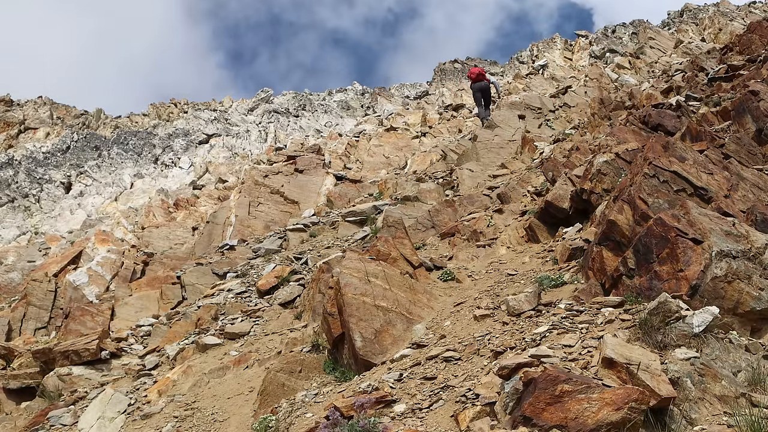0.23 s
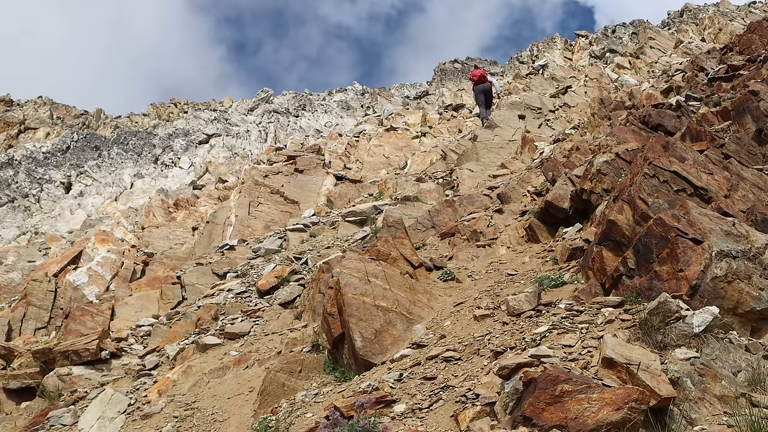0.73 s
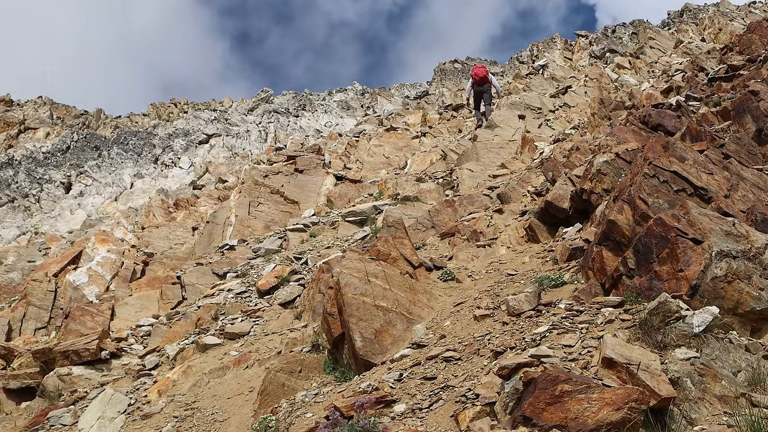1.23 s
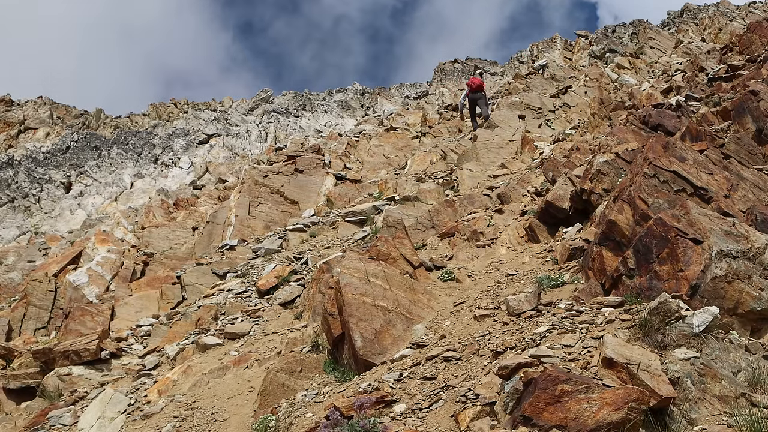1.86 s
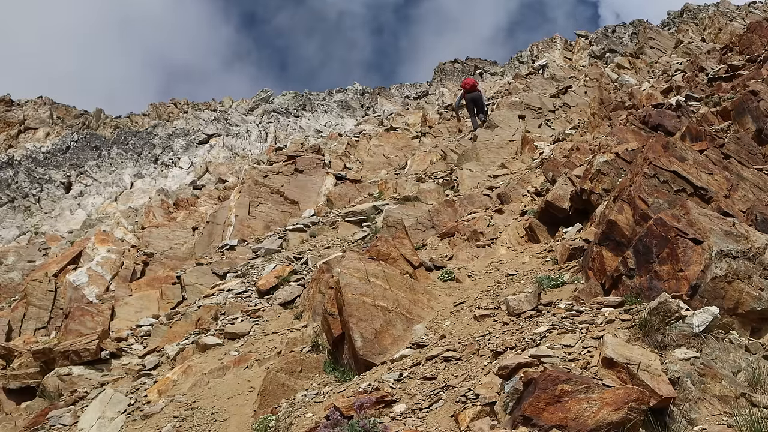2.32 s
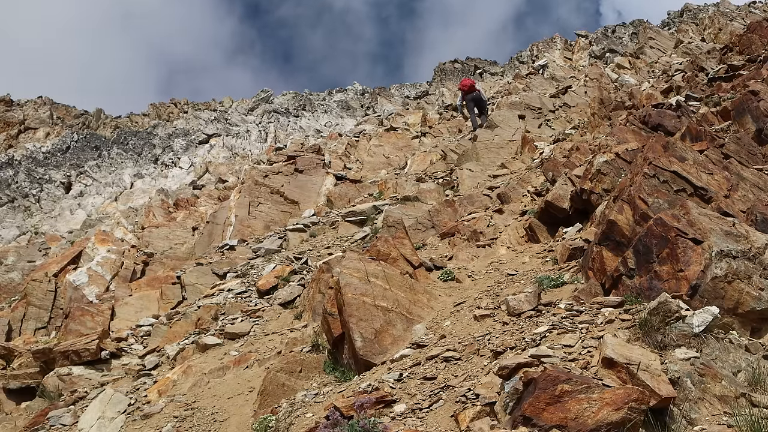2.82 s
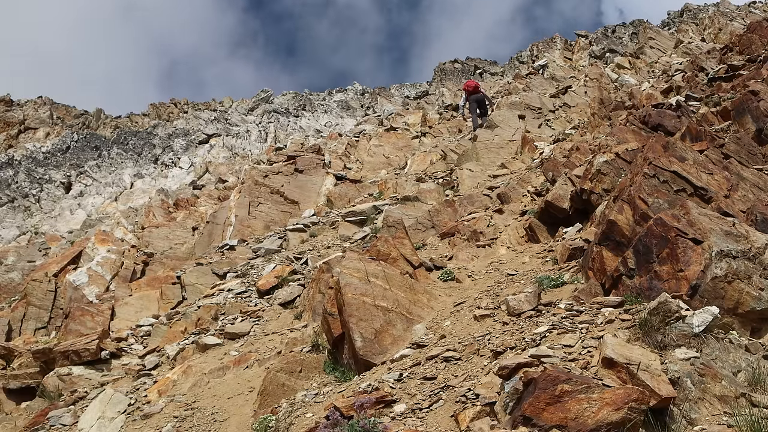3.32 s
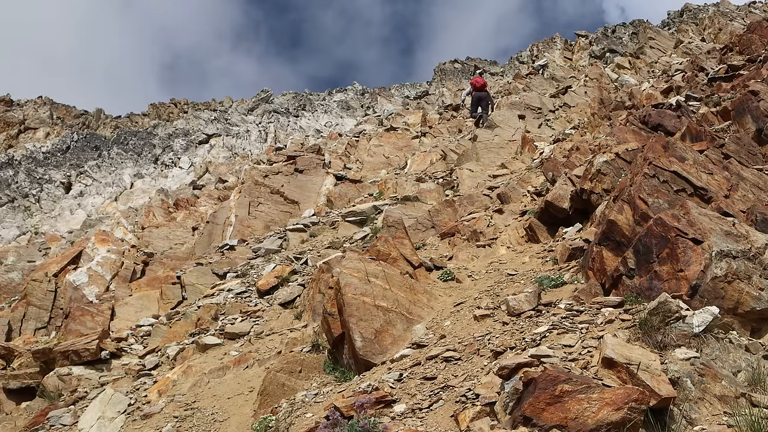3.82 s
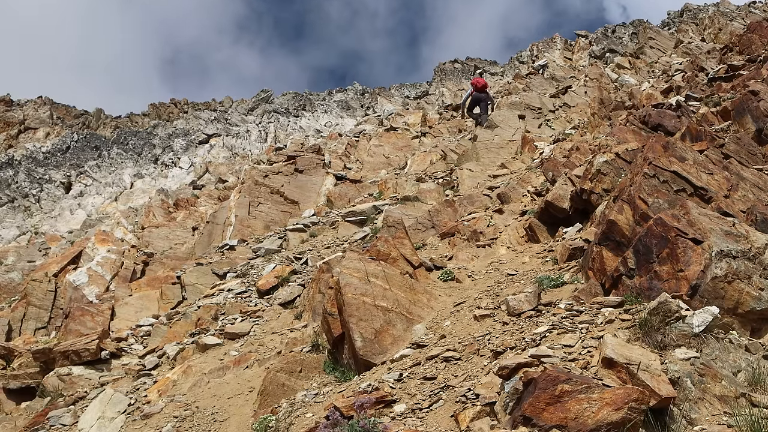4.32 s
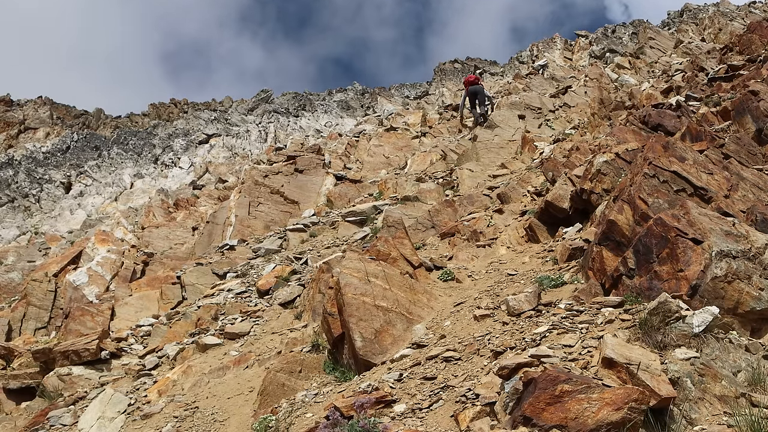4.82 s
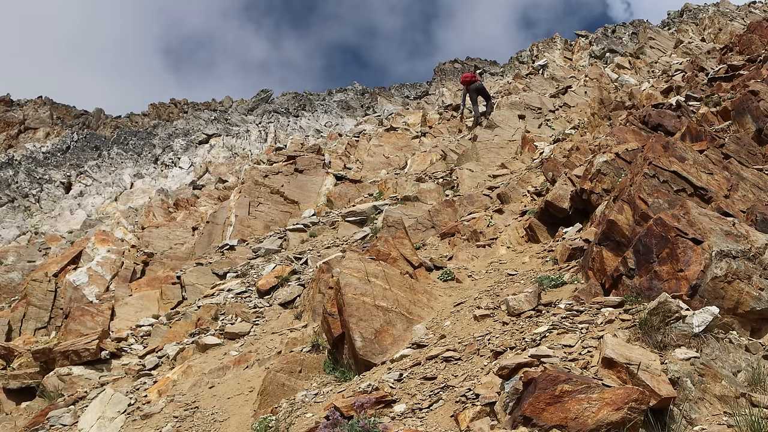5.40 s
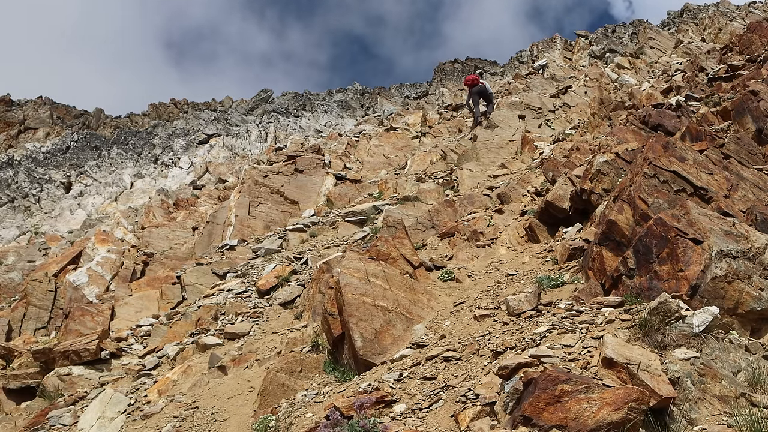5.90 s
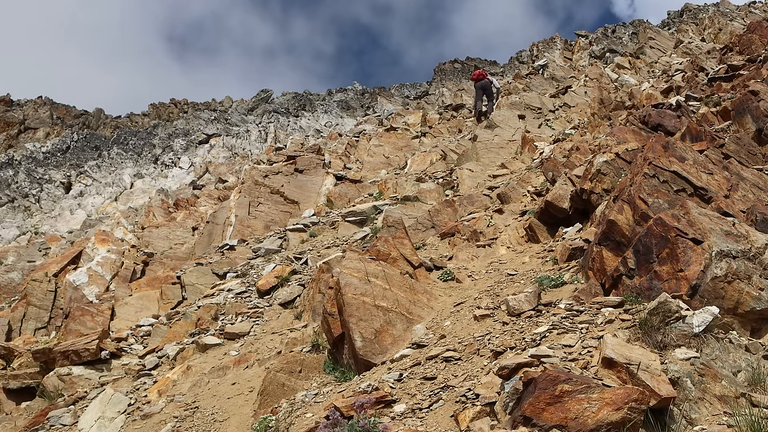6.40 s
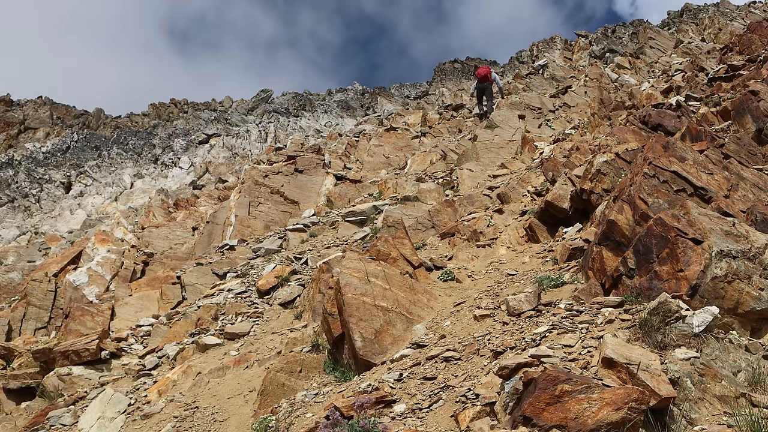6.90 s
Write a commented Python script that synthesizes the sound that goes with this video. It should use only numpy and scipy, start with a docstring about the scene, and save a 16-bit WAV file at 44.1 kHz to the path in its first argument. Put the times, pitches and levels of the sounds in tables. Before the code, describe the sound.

Loose stones knocked free on a steep rocky slope click, crack and grind irregularly over pattering grit, growing louder as they tumble closer outdoors.

```python
"""Stones knocked loose by boots on a steep slope click, crack and grind together, louder as they tumble closer.
Each contact is a set of short dying tones with a burst of bright noise, small ticks and a scrape of sand noise.
Grit patters between them as thousands of tiny rings over sand hiss and a low rumble; heavier stones thud as
low tones, and some stones ring longer on one note, from low tocks to high pings. Steady filtered noise makes
the soft outdoor floor, and a small microphone adds hiss and two treble resonances."""
import sys
import numpy as np
from scipy import signal
from scipy.fft import rfft, irfft, next_fast_len
from scipy.io import wavfile
from scipy.ndimage import uniform_filter1d, map_coordinates

SR = 44100
rng = np.random.default_rng(int(sys.argv[2]) if len(sys.argv) > 2 else 0)


def materialize(psi):
    """Save the field psi as 16-bit PCM at rate SR to the path in sys.argv[1].

    A 1-D psi becomes a single channel; in a 2-D psi each row is a channel.
    """
    bounded = np.clip(np.atleast_2d(psi).T, -1, 1)
    quanta = np.round(bounded * 32767).astype(np.int16)
    wavfile.write(sys.argv[1], SR, quanta)


def voltage_ratio(level):
    """Linear amplitude factor for a level in decibels (scalar or array-like)."""
    return 10 ** (np.asarray(level, float) / 20)


N = 315756  # length in samples

# The colour of sliding sand. Each row: frequency in Hz, relative level in dB.
SAND_COLOUR = [(290, -1), (500, 3.5), (5130, 2.5), (8600, -0.5), (10100, -13.5), (12700, -3), (15500, -26)]


def unit(x):
    """Scales a sound to an rms (average strength) of 1."""
    return x / np.sqrt(np.mean(x ** 2) + 1e-20)


def coloured(x, points):
    """Filters x through a spectrum drawn by (Hz, dB) points on a log frequency axis."""
    m = next_fast_len(N + 8192)
    f, v = np.transpose(points)
    gain = voltage_ratio(np.interp(np.log(np.fft.rfftfreq(m, 1 / SR) + 1), np.log(f + 1), v))
    return irfft(rfft(x, m) * gain, m)[:N]


def placed(s, rows):
    """Adds up short sounds, one a row, starting at times s in seconds."""
    at = np.round(np.asarray(s) * SR).astype(int)[:, None] + np.arange(rows.shape[1])
    return np.bincount(at.ravel(), rows.ravel(), N + SR)[:N]


def rings(hz, db, cycles, rise, size):
    """Struck tones: sines that fall 60 dB in a number of cycles; rise is the time constant in cycles."""
    turns = np.clip(hz, 50, SR / 2.2)[:, None] * np.arange(size) / SR  # cycles since the start
    fall = voltage_ratio(db[:, None] - 60 * turns / cycles)
    return fall * (1 - np.exp(-turns / rise)) * np.sin(2 * np.pi * turns)


def outdoor_air():
    """The steady outdoor floor is random noise, strongest in the bass."""
    # Colour of the floor. Each row: frequency in Hz, relative level in dB.
    air_colour = [(15, 4), (45, 9), (80, 0.5), (300, -19), (2500, -31), (9000, -51)]
    return voltage_ratio(-57.5) * unit(coloured(rng.standard_normal(N), air_colour))


def microphone_hiss():
    """The microphone's own hiss is plain white noise."""
    return voltage_ratio(-71) * rng.standard_normal(N)


def sliding(s):
    """How busy the slide is: its level in dB at times s, which guides the grit and the lesser contacts."""
    # Course of the slide. Each row: time in seconds, level in dB.
    slide_level = [(0.0, -48.5), (0.8, -52.5), (1.04, -47.5), (1.33, -49), (1.36, -45), (1.93, -43),
                   (2.79, -41), (3.05, -37), (3.81, -38), (3.95, -42), (4.21, -39), (4.65, -36),
                   (4.69, -36), (5.14, -37), (5.44, -40.5), (5.7, -42.5), (6.1, -40.5), (6.52, -44),
                   (6.86, -39), (7.16, -40)]
    return np.interp(s, *np.transpose(slide_level))


def grit_patter(count=6500):
    """Small chips ring in clumps, few of them large; the lower ticks are the softer."""
    luck, chance = rng.standard_normal((count, 2)), rng.random((count, 2))
    start = chance[:, 0] * N / SR
    clumps_db = 3 * map_coordinates(rng.standard_normal(600), [start * 50])  # 50 random points a second
    size_db = np.minimum(-4.0 * np.log(chance[:, 1] + 1e-9), 16) + clumps_db
    size_db += 3.9 * np.minimum(luck[:, 0], 0) + 2.8 * np.maximum(luck[:, 0], 0)
    hz = 4300 * np.exp(0.8 * luck[:, 0])
    return unit(placed(start, rings(hz, size_db, cycles=18.0, rise=0.038, size=300)))


def sand_hiss():
    """Sliding sand is noise whose strength varies in patches over pitch and time."""
    z = signal.stft(rng.standard_normal(N + 512), nperseg=256)[2]
    patches = uniform_filter1d(rng.standard_normal(z.shape), size=10, axis=0)
    patches = uniform_filter1d(patches, size=10, axis=1)
    # the swells reach wider in pitch and last longer
    swells = uniform_filter1d(rng.standard_normal(z.shape), size=16, axis=0)
    swells = uniform_filter1d(swells, size=70, axis=1)
    field_db = 2.5 * unit(patches) + 2.2 * unit(swells)
    noise = signal.istft(z * voltage_ratio(field_db), nperseg=256)[1][:N]
    return unit(coloured(noise, SAND_COLOUR))


def low_rumble(clock):
    """The ground rumbles as low noise in random lumps."""
    # Colour of the rumble. Each row: frequency in Hz, relative level in dB.
    ground_colour = [(60, 6), (130, 2), (300, 0.5), (450, -4), (1000, -24.5)]
    # Course of the rumble. Each row: time in seconds, level in dB ahead of the scene's bass cut.
    rumble_level = [(0, -49.5), (0.85, -53.5), (1.0, -46), (2.5, -45), (3.5, -46), (5.25, -42.5),
                    (5.45, -45.5), (7.16, -45)]
    lumps = voltage_ratio(3.2 * map_coordinates(rng.standard_normal(400), [clock * 40]))  # 40 random points a second
    rumble = unit(lumps * coloured(rng.standard_normal(N), ground_colour))
    return voltage_ratio(np.interp(clock, *np.transpose(rumble_level))) * rumble


def grit():
    """Pattering chips throw up sand, with a treble that changes over time, above the rumble."""
    # Course of the grit's treble. Each row: time in seconds, gain in dB.
    treble_gain = [(0, -17), (1.4, 2.5), (2.7, 1), (3.3, 3.5), (4.5, -3), (5.4, 1), (5.9, 6), (7.16, 7)]
    clock = np.arange(N) / SR
    patter = grit_patter()
    fizz = unit(1 + 1.64 * uniform_filter1d(np.abs(patter), size=60))  # every tick throws up sand
    fine = voltage_ratio(sliding(clock)) * (voltage_ratio(-3.22) * patter + voltage_ratio(-5.5) * sand_hiss() * fizz)
    treble = signal.sosfiltfilt(signal.butter(2, 9500, "high", fs=SR, output="sos"), fine)
    fine = fine + (voltage_ratio(np.interp(clock, *np.transpose(treble_gain))) - 1) * treble
    return fine + low_rumble(clock)


def lesser(count=230):
    """Smaller contacts come by chance, 26 a second on average, and louder when the slide is busy."""
    s = np.cumsum(rng.exponential(size=count)) / 26
    size, pitch, crack, grind = np.clip(rng.standard_normal((count, 4)), -2, 1.5).T
    ring_db = sliding(s) + 8 + 4 * size
    hz = 2800 * np.exp(.7 * pitch)
    # same columns as the clear contacts
    rows = np.transpose([s, ring_db, hz, 2.5 + 7 * crack, -19 + 3 * grind])
    return rows[s < N / SR]


def chip_rings(hz, db, luck):
    """A struck chip rings at its own pitch and at stray ones, snaps broadly and pushes the ground."""
    ring = rings(hz, db, cycles=8.4, rise=0.13, size=1400)
    ring += rings(hz * .55 * np.exp(.25 * luck[:, 0]), db - 8, cycles=6.0, rise=.3, size=1400)
    ring -= rings(hz * 1.957 * np.exp(0.28 * luck[:, 1]), db - 4.0, cycles=14.3, rise=1.0, size=1400)
    # big stones, low in pitch, snap harder
    snap_db = db - 2.5 - 5 * np.log2(hz / 800)
    ring += rings(np.full_like(hz, 3600), snap_db, cycles=2.9, rise=0.12, size=1400)
    # the ground's soft answer, kept to -25 dB at most
    push_db = np.minimum(db - 17.5 + 5 * luck[:, 2] - 3 * np.log2(hz / 2500), -25)
    push_hz = 309.5 * np.exp(0.22 * luck[:, 3])
    return ring + rings(push_hz, push_db, cycles=7.1, rise=0.49, size=1400)


def chip_cracks(s, crack_db):
    """The crack of a blow is bright noise that falls 60 dB in 9.2 ms."""
    t = np.arange(1400) / SR
    shape = placed(s, voltage_ratio(crack_db[:, None] - 60 * t / 0.0092) * (1 - np.exp(-t / 0.0014)))
    bright = coloured(rng.standard_normal(N), [(4000, 5.0), (7000, 8.0), (15500, -2.0)])
    return shape * unit(bright)


def chip_grinds(s, hz, grind_db, count=16):
    """A chip jostles its neighbours after the blow: a dying cluster of small ticks and a scrape of sand."""
    delay = .033 * rng.random((len(s), count)) ** 1.5  # seconds after the blow
    jostle = np.clip(rng.standard_normal((len(s), count, 2)), -1.2, 2)
    tick_hz = hz[:, None] ** .5 * 60 * np.exp(0.556 * jostle[..., 0])  # leans towards the chip's pitch
    tick_db = grind_db[:, None] + 8 + 2.45 * jostle[..., 1] + 2.35 * jostle[..., 0] - 60 * delay / 0.033
    ticks = rings(tick_hz.ravel(), tick_db.ravel(), cycles=14.4, rise=0.051, size=400)
    rattle = placed((s[:, None] + delay).ravel(), ticks)
    t = np.arange(1400) / SR
    scrape = placed(s, voltage_ratio(grind_db[:, None] - 4 - 60 * t / 0.042) * (1 - np.exp(-t / 0.0011)))
    return rattle + scrape * unit(coloured(rng.standard_normal(N), SAND_COLOUR))


def contacts():
    """Stones strike each other: every contact rings, cracks and grinds to rest."""
    # The clear contacts. Each row: start in seconds, ring level in dB, ring pitch in Hz,
    # crack level in dB over the ring, grind level in dB over the ring.
    clear_contacts = [(0.0286, -19.5, 5300, -20, -21), (0.0515, -24, 4400, -29.0, -14),
                      (0.0668, -21, 2520, -21, -21), (0.1051, -28, 1800, -3, -23),
                      (0.1994, -16, 2470, -33.0, -19.5), (0.2622, -18.5, 5400, -13, -34),
                      (0.4226, -15.5, 2060, -30, -20.5), (0.4872, -15.5, 3700, -31.0, -21),
                      (0.5288, -19, 5370, -7, -20), (0.6924, -26, 4340, -24, -15),
                      (0.891, -26, 2640, -19, -24), (0.9115, -21.5, 2080, -34.0, -31),
                      (0.935, -20, 3030.0, -30.0, -12), (0.9718, -25, 2730, -25, -25),
                      (0.9769, -19, 2080, -24.0, -16), (0.9965, -19, 2550, -25, -20),
                      (1.0036, -20.5, 1710, -30, -17), (1.0299, -26.5, 1340, -28.0, -11),
                      (1.062, -26, 1410, -20, -21), (1.1295, -29.5, 1700, -25, -18),
                      (1.153, -31, 1800, -20, -20), (1.2124, -6.5, 3070, -34, -29),
                      (1.2415, -33, 1710, -13, -2.5), (1.3471, -24.5, 5100, -13, -8),
                      (1.3863, -19, 4680, -16.0, -22), (1.4165, -28, 4660, -15, -20),
                      (1.4275, -26, 1160, -20, -24), (1.4435, -20, 1180, -26.0, -14),
                      (1.4456, -15.5, 3850, -25, -22.5), (1.5855, -26, 1830, -20, -25),
                      (1.598, -14.5, 3430, -16, -16), (1.6294, -22, 3020, 2.5, -13),
                      (1.7565, -20.5, 3670, -18, -28), (1.9568, -32, 900, 12.5, -2),
                      (1.9983, -12, 5300, -26, -18.5), (2.0982, -13.5, 5430.0, -15, -25),
                      (2.1065, -11, 6750, -5, -36), (2.1436, -24.5, 1120, -17.0, -11),
                      (2.241, -24, 2200, -17, -8), (2.2845, -26, 890, -15, -25),
                      (2.3003, -12.5, 2080, -29.0, -19), (2.4046, -22, 2520, -27.0, -6),
                      (2.4275, -23, 4250, -15, -27), (2.4721, -20, 1090, -19, -13),
                      (2.5115, -20.5, 1750, -20, -22), (2.566, -19.5, 677, 3, -36),
                      (2.7032, -11.5, 8100, -7, -35), (2.719, -19.5, 2100, -19, -16),
                      (2.8601, -20, 1700, -19.0, -11), (2.905, -13.5, 1460, -8, -10),
                      (2.9088, -11, 4500, -22.0, -11), (2.9228, -15.5, 1360, 11, -10.5),
                      (2.964, -3.5, 4630, -26.0, -26), (3.0956, -27, 1970, -15, -6),
                      (3.1512, -14, 1130, -7, -15), (3.1847, -10.5, 2670, -27.0, -17),
                      (3.3027, -12, 6140, 1.5, -25), (3.3057, -10, 8200, -13, -45),
                      (3.3219, -16, 2860, -22, -12), (3.3332, -9, 3840, -14, -14),
                      (3.3412, -16, 2340, -25, -16), (3.5099, -15.5, 2980, -8, -13),
                      (3.5166, -8.5, 1980, -24.0, -23.5), (3.532, -7.5, 3550, -29.0, -26),
                      (3.6437, -14, 1030, -12, -7.5), (3.7519, -7, 2920, -13, -23.5),
                      (3.7672, -8.0, 3550, -16, -12), (3.9303, -9.5, 4050, -17.0, -21),
                      (3.9476, -6.5, 2450, -22, -18), (3.9593, -15.5, 1850, -25.0, -12),
                      (3.9785, -21, 1800, -20, -18), (4.1065, -21, 2090, -20, -28),
                      (4.127, -23, 1060, -20, -28), (4.1628, -10.5, 6540.0, -13, -22),
                      (4.2347, -12, 3890.0, -30, -24), (4.288, -22.5, 795, -15, -9.5),
                      (4.2993, -7, 9300, -25, -20), (4.3688, -15, 2350, -22, -39),
                      (4.3995, -14.5, 2720, -26, -16), (4.488, -32, 2500, -20, -30),
                      (4.4982, -9.5, 3580, -33.0, -14.5), (4.5487, -3, 3740, -27, -24),
                      (4.6071, -15, 4560, -18.0, -12), (4.6328, -12, 6000, -11, -10),
                      (4.7343, -14, 8450, -0.5, -16.5), (4.8139, -7, 5940, -21, -19.5),
                      (4.8337, -11.5, 5600, -17, -18), (4.8861, -13.5, 2800, -21.0, -9),
                      (4.9073, -3.5, 6500, -12, -21), (4.9249, -10.5, 2870, -3, -31),
                      (4.9975, -9.5, 7400, -13, -26), (5.017, -10, 6100, -12, -32),
                      (5.0595, -3, 2600, -10, -21), (5.0808, -13, 7390.0, -18, -39),
                      (5.0935, -26, 1000, -20, -33), (5.1155, -17.5, 2500, -20, -5.5),
                      (5.1204, -5, 3420, -24, -18), (5.1345, -31, 4000, -12, -30),
                      (5.1635, -14.5, 6000, -15, -19), (5.182, -10.5, 3320, -32.0, -16.5),
                      (5.1967, -8, 1900, -34, -29), (5.2476, -19.5, 1180, -12, -9),
                      (5.262, -21, 3000, -15, -10), (5.2841, -19.5, 920, -20.0, -12),
                      (5.3061, -11.5, 6700, -18.0, -19), (5.4029, -3, 1445, -30, -23),
                      (5.4755, -21, 2300, -23, -18), (5.5322, -8, 874, -29, -24),
                      (5.5426, -9, 1150, -27, -19.5), (5.7475, -13.5, 980, -15, -39),
                      (5.8526, -18, 2540, -26, -19), (5.8831, -13.5, 4330, -20, -22),
                      (5.8985, -14.5, 3740, -27, -22), (5.9389, -13, 2280, -10, -18),
                      (6.0107, -18, 1180, -29.0, -9.5), (6.0529, -9.5, 760, -26.0, -22),
                      (6.0728, -21, 1510, -4, -10), (6.2234, -14.5, 3560, -29, -31),
                      (6.2448, -15.5, 7950, -23.0, -13), (6.2815, -16, 3870, -26.0, -7.5),
                      (6.2971, -21, 1160, 10.5, -12), (6.367, -18.5, 3520, -11, -36),
                      (6.5754, -14, 1200, 11.5, -10), (6.5866, -10, 5870, -14, -11),
                      (6.594, -3.5, 6140, -6, -40), (6.7028, -12.5, 2750, -3, -47),
                      (6.7795, -15, 1870, 3, -29), (6.7902, -16, 6200, -3, -8),
                      (6.7987, -9, 1170, -24.0, -20), (6.8661, -17, 1010, 7.5, -11),
                      (6.878, -18, 5930.0, -20.0, -36), (6.9482, -6.5, 860, -0.5, -31.5),
                      (6.9657, -24, 1080, 3, -5.5), (6.9898, -23.5, 806, 12.5, -7.5),
                      (7.0566, -24.5, 2760, -8, -1)]
    s, db, hz, crack_db, grind_db = np.vstack([clear_contacts, lesser()]).T
    luck = np.clip(rng.standard_normal((len(s), 4)), -2, 2)
    ring = placed(s, chip_rings(hz, db, luck))
    return ring + chip_cracks(s, db + crack_db) + chip_grinds(s, hz, db + grind_db)


def thuds():
    """A landing stone pushes the packed ground, which answers with a few low cycles and a weaker overtone."""
    # Heavier stones landing. Each row: start in seconds, level in dB, pitch in Hz.
    landings = [(0.104, -28.5, 315), (0.158, -30, 307), (0.198, -29, 282), (0.528, -32, 290),
                (1.588, -21, 250), (1.878, -19.5, 323), (2.265, -23.5, 473), (2.299, -18.5, 383),
                (2.439, -25, 310), (2.474, -17.5, 440), (2.5382, -19.5, 383), (2.596, -17.5, 234),
                (2.9235, -15, 352), (3.1521, -18.5, 315), (3.3382, -21.5, 330), (3.6434, -21.5, 406),
                (3.77, -22.5, 383), (3.828, -23, 315), (4.195, -20.5, 350), (4.4999, -13.5, 440),
                (4.5979, -16.5, 415), (4.752, -19, 154), (4.925, -20, 377), (5.0606, -17.5, 193),
                (5.209, -23, 181), (5.2835, -21, 220), (5.4025, -6.5, 387), (5.5333, -9, 347),
                (5.7462, -13.5, 537), (6.0524, -17, 285), (6.2924, -22.5, 193), (6.578, -19, 198),
                (6.8006, -25, 323), (6.8706, -10, 425), (6.948, -17, 224), (6.99, -11.5, 222)]
    s, db, hz = np.transpose(landings)
    body = rings(hz, db, cycles=6.86, rise=0.26, size=3000)
    overtone = rings(1.9 * hz, db - 9, cycles=9.0, rise=.2, size=3000)
    return placed(s, body + overtone)


def ringing():
    """Some stones ring longer, for more cycles on one note, from low tocks to high pings."""
    # Stones that ring longer. Each row: start in seconds, level in dB ahead of the slow rise, pitch in Hz.
    ringing_stones = [(1.9274, -17.5, 875), (1.9568, -18.5, 875), (2.0473, -21.5, 900), (3.305, 5.5, 8700),
                      (4.3998, -10, 2900), (5.1203, 6, 3500)]
    s, db, hz = np.transpose(ringing_stones)
    return placed(s, rings(hz, db, cycles=18.5, rise=0.99, size=1400))


def scene():
    """Stones and grit, thin in the deep bass, over the outdoor floor and the microphone's hiss."""
    bass_cut = signal.butter(2, 110, "high", fs=SR, output="sos")
    stones = signal.sosfilt(bass_cut, grit() + contacts() + thuds() + ringing())
    return (stones + outdoor_air() + microphone_hiss())[None]


def microphone(dry):
    """The microphone resonates in two treble bands and passes nothing from 15900 Hz up."""
    # Resonances. Each row: centre in Hz, width in Hz, lift in dB.
    resonances = [(4700, 500, 4), (8700, 900, 4)]
    m = next_fast_len(N + 8192)
    f = np.fft.rfftfreq(m, 1 / SR)
    response = np.ones(len(f), complex)
    for centre, width, db in resonances:
        response += (voltage_ratio(db) - 1) * 1j * f * width / (centre ** 2 - f ** 2 + 1j * f * width)
    response *= f < 15900
    return irfft(rfft(dry, m) * response, m)[:, :N]


def top_cut(x):
    """Nothing passes above the cut-off."""
    return signal.sosfilt(signal.butter(12, 16990, fs=SR, output="sos"), x)


def record(dry):
    """The scene as the microphone picks it up, made ready to store."""
    mix = microphone(dry)
    return top_cut(mix)


dry = scene()
out = record(dry)
materialize(out)
```